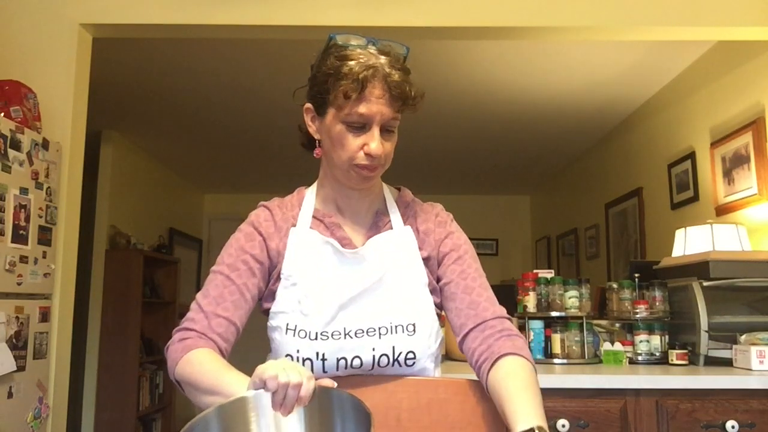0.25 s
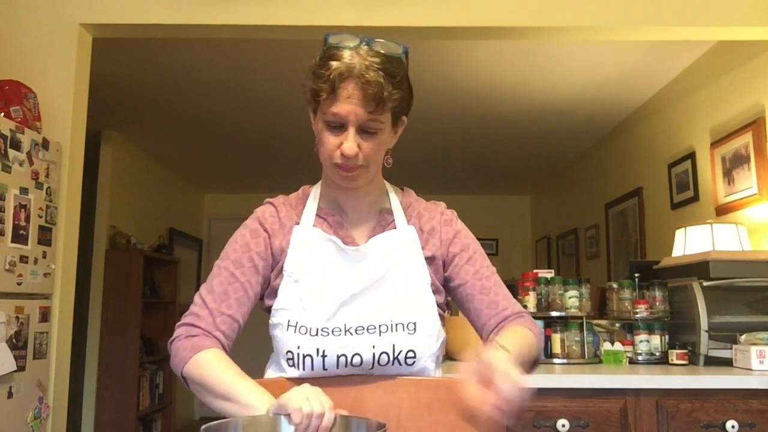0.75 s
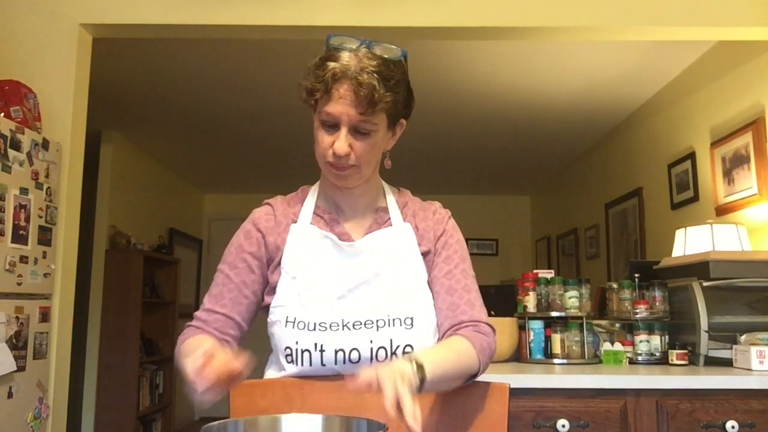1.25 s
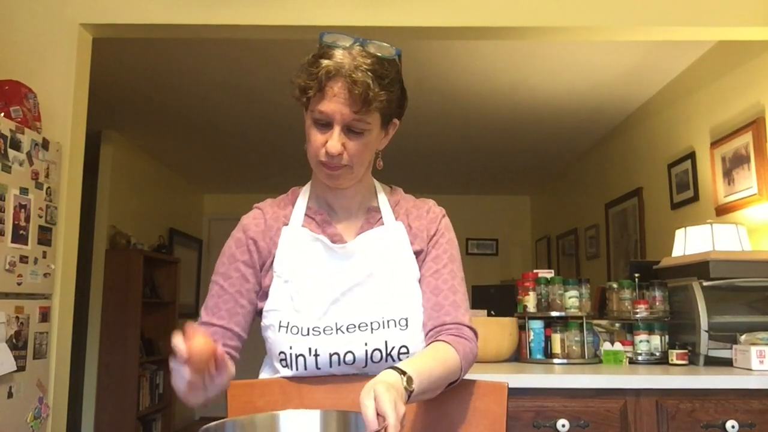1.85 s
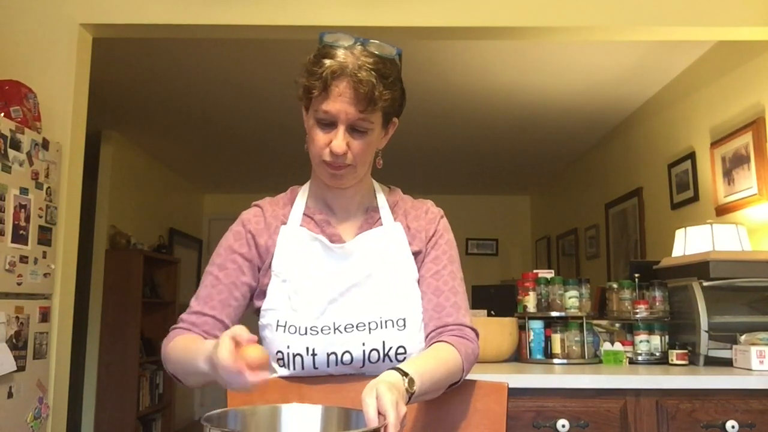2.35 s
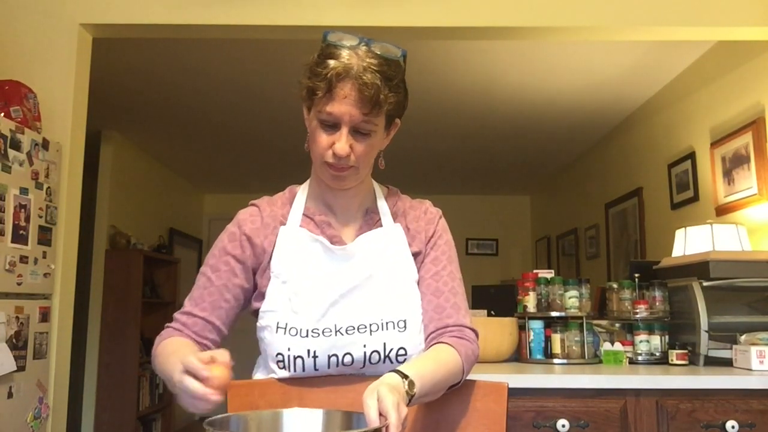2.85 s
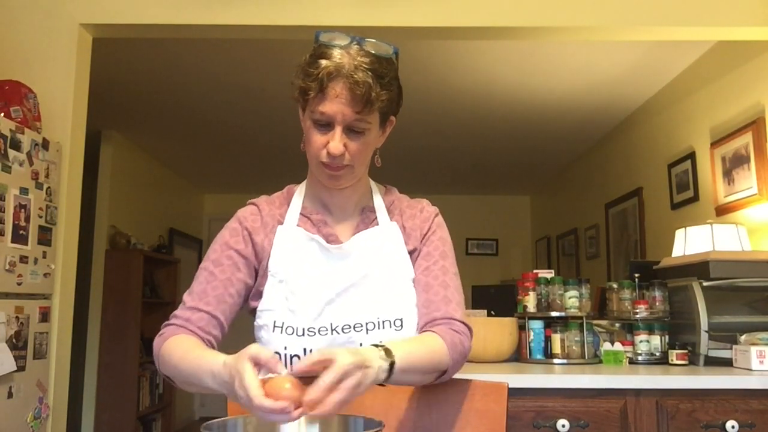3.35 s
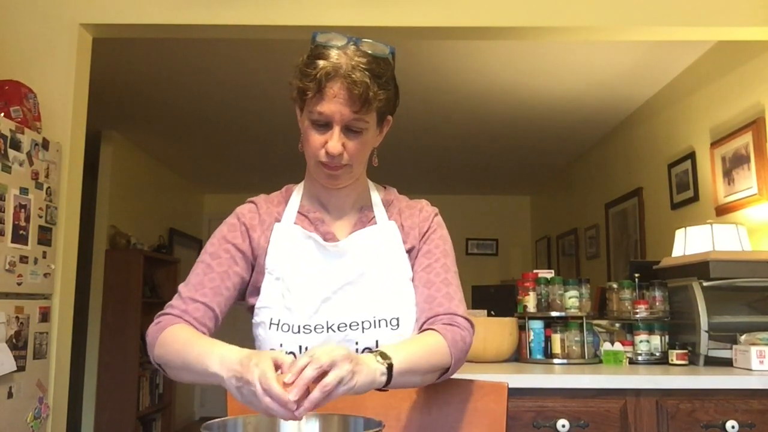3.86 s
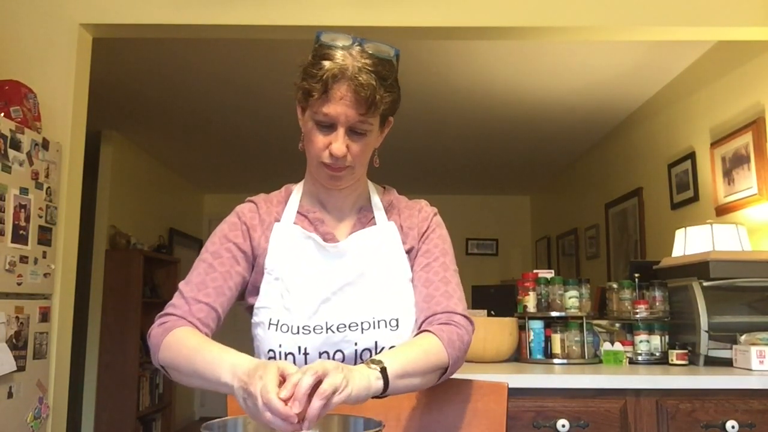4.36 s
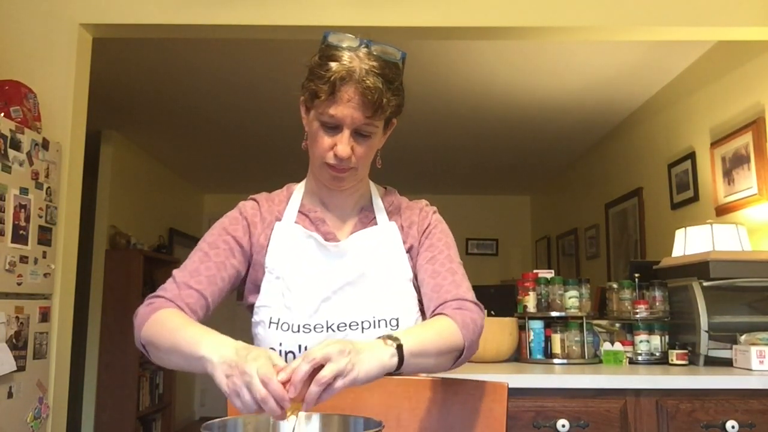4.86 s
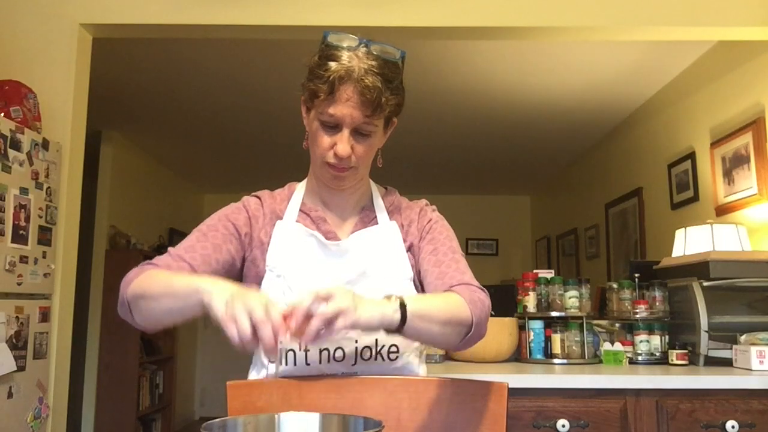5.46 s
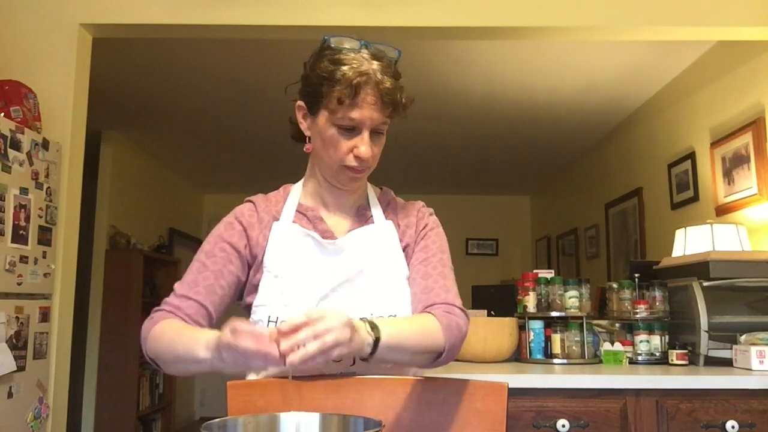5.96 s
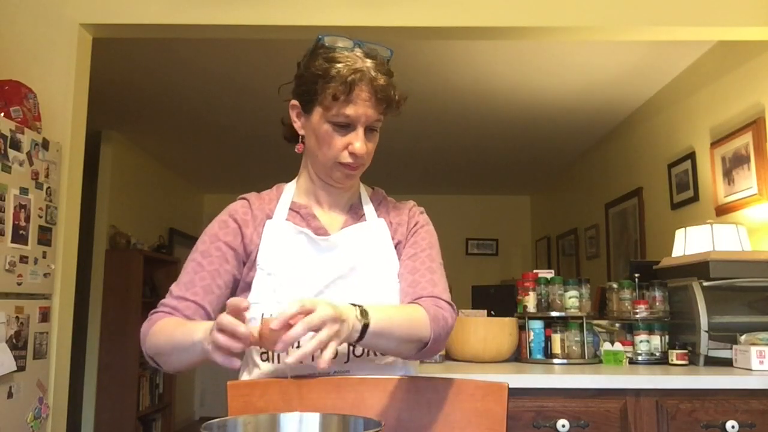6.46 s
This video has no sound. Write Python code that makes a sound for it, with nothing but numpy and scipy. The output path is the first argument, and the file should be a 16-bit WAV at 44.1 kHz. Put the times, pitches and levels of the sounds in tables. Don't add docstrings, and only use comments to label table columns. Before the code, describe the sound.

A small, hard, echoing kitchen with a low, slightly wavering fridge hum and soft air noise throughout. At 0.15 s a steel bowl lands on a wooden counter: a solid thud, bright edge click and thin lingering ring. It slides softly, and knocks again more lightly at 0.67 s, with short scrapes and dull hand bumps to 1.5 s. A faint nudge comes at 1.77 s. At 2.1 s an egg strikes the rim, a sharp crunchy tap with a short bowl ring. At 2.98 s the bowl thuds down firmly, bouncing twice more weakly. Faint falling bird chirps sound from 3.25 to 4.0 s amid light brushing. Shell snaps at 3.77 and 4.1 s, then splits loudest at 4.55-4.6 s with a quick wet tearing crackle. Small flakes tick; yolk drops with soft low slaps around 5.3-5.5 s. Scattered cracks and clicks continue to 6.2 s, then a soft rustle ends it.

```python
import sys
import numpy as np
from scipy import signal
from scipy.fft import rfft, irfft, next_fast_len
from scipy.io import wavfile
from scipy.ndimage import uniform_filter1d

SR = 44100
rng = np.random.default_rng(int(sys.argv[2]) if len(sys.argv) > 2 else 0)


def store_pcm(level_fs):
    pcm = np.round(np.clip(level_fs, -1, 1) * 32767).astype(np.int16)
    wavfile.write(sys.argv[1], SR, np.atleast_2d(pcm).T)


def decibels_to_gain(level_db):
    exponent = np.asarray(level_db, float) / 20
    return 10 ** exponent


N = 296484
T = np.arange(N) / SR
SIZE = next_fast_len(N + SR)
HZ = np.arange(SIZE // 2 + 1) * SR / SIZE + 1e-3

# [t/s, thud level/dB, edge click level/dB, ring level/dB]
LANDINGS = [
    (0.14, -20, -27.5, -35),
    (0.664, -37, -35.5, -45.5),
    (0.672, -26, -44, -45),
    (1.771, -41.5, -80, -60.5),
    (2.981, -22, -26, -35.5),
    (3.106, -35, -40.5, -53),
    (3.234, -46.5, -57, -63),
]
# [t/s, shell level/dB, low knock level/dB, contact/ms]
EGG_BLOWS = [
    (2.0974, -16.5, -31.5, 4.3),
    (2.1116, -16.5, -44, 2.7),
]


def on_log(table, hz):
    f, v = np.transpose(table)
    return np.interp(np.log(hz), np.log(f), v)


def unit(x):
    return x / np.max(np.abs(x))


def band(x, hz, octaves, order=2):
    half = 2 ** (np.clip(octaves, .05, 5) / 2)
    edges = [hz / half, min(hz * half, .45 * SR)]
    return signal.sosfilt(signal.butter(order, edges, "band", fs=SR, output="sos"), x)


def above(x, edge):
    hz = 1000 * 2 ** np.clip(edge, 0, 3.5)
    return signal.sosfilt(signal.butter(4, hz, "high", fs=SR, output="sos"), x)


def add(out, s, x):
    i = int(s * SR)
    out[i:i + len(x)] += x[:N - i]


def decay(t, t60):
    return np.exp(-np.log(1000) * t / t60)


def walk(rate):
    k = int(SR / rate)
    steps = np.repeat(rng.standard_normal(N // k + 1), k)
    return 1.302 * uniform_filter1d(uniform_filter1d(steps, k), k)[:N]


def ring(modes, scatter_db):
    t = T[:SR]
    out = np.zeros(len(t))
    for hz, db, t60 in modes:
        loudness, detune = rng.standard_normal(2)
        tone = np.sin(2 * np.pi * hz * (1 + 0.0012 * detune) * t)
        out += decibels_to_gain(db + scatter_db * loudness) * decay(t, t60) * tone
    return out


def splinters(ms, spray=.2, density=.1):
    t = T[:SR // 10]
    hits = rng.random(len(t)) < density
    x = spray * rng.standard_normal(len(t)) * hits * np.exp(-t * 1000 / max(ms, .05))
    x[0] = 1
    return x


def clicks(rows, octaves):
    out = np.zeros(N)
    for s, db, hz in rows:
        add(out, s, decibels_to_gain(db) * unit(band(splinters(3.3, 0.23), hz, octaves, order=3)))
    return out


def fridge():
    # [f/Hz, rms level/dB]
    hum = [(118.4, -56.5), (409.1, -82.5), (457.6, -76), (581.4, -80), (640.6, -73.5), (699.8, -75),
           (1486, -90)]
    # [f/Hz, level per Hz/dB]
    air_colour = [(20, -34.5), (45, -13), (124, -9.5), (197, -9.5), (470, -23), (1060, -21.5), (3000, -43),
                  (16000, -59.5)]
    air = irfft(rfft(rng.standard_normal(SIZE)) * decibels_to_gain(on_log(air_colour, HZ)), SIZE)[:N]
    air *= decibels_to_gain(-57) / air.std()
    bass = signal.sosfiltfilt(signal.butter(2, 330, fs=SR, output="sos"), air)
    out = decibels_to_gain(2.2 * walk(7)) * bass + decibels_to_gain(0.8 * walk(20)) * (air - bass)
    for hz, db in hum:
        level = decibels_to_gain(db + 5.5 + 1.2 * walk(9))
        out += level * np.sin(2 * np.pi * np.cumsum(hz + 1.6 * walk(4)) / SR)
    settle_db, settle_s = 2, 2.7
    return out * decibels_to_gain(settle_db * (np.exp(-T / settle_s) - 0.43))


def played(peak, swell, db):
    rise_db, fade_db_per_s = 21.5, 309
    before = (peak - T) * rise_db / max(swell, .003)
    after = (T - peak) * fade_db_per_s
    return decibels_to_gain(db - np.where(T < peak, before, after))


def rustle():
    # [peak t/s, swell/s, rustle level/dB, steel share level/dB]
    slides = [
        (.1, .012, -62.5, -2),
        (.13, 0.019, -72, 12),
        (.54, 0.18, -68, -20),
        (0.656, 0.017, -62, 8),
        (.745, .01, -63.5, 4),
        (.856, 0.063, -67.5, -16),
        (1.72, 0.11, -68.5, -12),
        (1.766, 0.034, -65.5, -5.5),
        (2.975, 0.012, -58.5, 9),
    ]
    # [peak t/s, swell/s, level/dB]
    brushes = [
        (3.3, 0.027, -76),
        (3.45, .1, -84),
        (3.622, 0.065, -74),
        (3.75, .04, -69),
        (6.3, .05, -85),
        (6.462, 0.23, -68),
        (6.68, 0.05, -70),
    ]
    grit = rng.standard_normal(N) * decibels_to_gain(4.1 * rng.exponential(size=N).clip(0, 5))
    hiss, cloth = band(grit, 10000, 3.4), band(grit, 4100, 3.7)
    steel = band(grit, 4350, 0.1) + 0.48 * band(grit, 5800, 0.069)
    hiss, cloth, steel = hiss / hiss.std(), cloth / cloth.std(), steel / steel.std()
    out = np.zeros(N)
    for peak, swell, db, steel_db in slides:
        out += played(peak, swell, db) * (hiss + decibels_to_gain(steel_db) * steel)
    for peak, swell, db in brushes:
        out += played(peak, swell, db) * cloth
    return out * decibels_to_gain(-8.0)


def through_board(x):
    board_lag = 0.1206
    turns = board_lag * (2 * np.sqrt(HZ + 90) - HZ / np.sqrt(5000))
    radiated = 1 / np.sqrt(1 + (115 / HZ) ** 6)
    return irfft(rfft(x, SIZE) * radiated * np.exp(-2j * np.pi * turns), SIZE)[:N]


def knocks():
    # [f/Hz, level/dB, t60/s]
    counter = [(123.6, -16, 0.13), (162.3, 4, 0.31), (186.7, 1, 0.049), (233.8, 4.5, 0.18), (298, -5, 0.22),
               (346.7, -1, 0.3), (440, 1, 0.13), (581, -14, 0.18), (723, -8, 0.23), (977, -10.5, 0.26),
               (1346, -17.5, 0.55), (1693, -15, 0.28)]
    # [f/Hz, level/dB, t60/s]
    walls = [(1870, -1, 0.224), (1625, -1, 0.27), (2610, -13, 0.31), (3973, -10.5, 0.16), (5970, -24, 0.06),
             (6040, -8, 0.097), (6510, -10, .18), (8320, -1.5, 0.04)]
    # [f/Hz, level/dB, t60/s]
    base = [(4414, 0, 0.15), (4445, -11, 0.16), (4390, -15.5, 0.47), (4490, -14, .12)]
    # [t/s, level/dB]
    bumps = [
        (0.594, -46.5),
        (0.94, -52),
        (1.473, -47),
        (6.609, -59),
    ]
    contact_lag_s = .002
    wood, edge, boom, steel = np.zeros((4, N))
    # 1 dB for the bowl, -13 dB for the hand
    hits = [(s, db, 1) for s, db, _, _ in LANDINGS] + [(s, db, -13) for s, db in bumps]
    for onset, thud_db, body_db in hits:
        s = onset + contact_lag_s
        add(wood, s, decibels_to_gain(thud_db + 4.5) * unit(band(splinters(4.2, 0.12), 289, 2.96, order=3)))
        add(wood, s, decibels_to_gain(thud_db + body_db) * unit(band(splinters(11, 0.22), 1226, 1.8, order=3)))
        add(boom, s, decibels_to_gain(thud_db + 2.0) * unit(ring(counter, 1.5)))
    for onset, _, edge_db, ring_db in LANDINGS:
        s = onset + contact_lag_s
        add(edge, s, decibels_to_gain(edge_db + 2.0) * unit(band(splinters(13.8, 0.35), 6820, 2.48)))
        add(steel, s, decibels_to_gain(ring_db + 2.5) * ring(base, .7))
        add(steel, s, decibels_to_gain(ring_db - 3) * ring(walls, 1.58))
    rattle_db, rattle_per_s = 4.5, 70
    steel *= decibels_to_gain(rattle_db * (walk(rattle_per_s) - .5))
    return through_board(wood) + edge, through_board(boom) + steel


def singing():
    # [f/Hz, level/dB, t60/s]
    tilted = [(1653, -51, .85), (2698, -55, .8), (2728, -56, .8), (4194, -49, .5), (4021, -54, .4),
              (5609, -47, .33)]
    # [f/Hz, level/dB, t60/s]
    free = [(324, -33.5, 0.056), (600, -51, 1), (963, -43, 0.78), (1775, -38.5, 0.57), (1747, -49.5, 0.75),
            (2390, -36.5, 0.06), (2680, -52, 0.66), (2730, -59.5, 1.1), (4285, -41.5, 0.14),
            (4580, -27.5, 0.026), (5770, -46, 0.17), (6300, -57.5, 0.22)]
    out = np.zeros(N)
    add(out, LANDINGS[0][0], decibels_to_gain(5.5) * ring(tilted, 0))
    add(out, EGG_BLOWS[0][0], decibels_to_gain(0.5) * ring(free, 0))
    return out


def tap():
    out = np.zeros(N)
    for s, shell_db, low_db, ms in EGG_BLOWS:
        add(out, s, decibels_to_gain(shell_db + 2.5) * unit(band(splinters(ms, 0.46, 0.2), 10750, 2.85)))
        add(out, s, decibels_to_gain(low_db + 10.0) * unit(band(splinters(ms, 0.25), 750, 3.7, order=3)))
    return out


def bird():
    # [t/s, level/dB]
    notes_sung = [
        (3.258, -73),
        (3.368, -78),
        (3.483, -76.5),
        (3.615, -78),
        (3.875, -85),
        (4.013, -79),
    ]
    start_hz, end_hz, note_s = 3620, 3120, 0.0394
    out = np.zeros(N)
    u = T[:int(note_s * SR)] / note_s
    hz = end_hz + (start_hz - end_hz) * (1 - u) ** 2
    for s, db in notes_sung:
        add(out, s, decibels_to_gain(db + 2.0) * np.sin(np.pi * u) * np.sin(2 * np.pi * np.cumsum(hz) / SR))
    return out


def loose_pieces():
    # [t/s, level/dB, f/Hz]
    pieces = [(3.43, -70, 7060), (3.45, -68, 6020), (3.765, -46, 8500), (4.094, -42, 4240),
              (4.1204, -43, 5300), (4.4547, -59, 5770), (4.518, -47, 8450), (4.55, -31, 4240),
              (4.584, -35, 3000), (4.603, -39, 3380), (4.612, -52, 3230), (4.6253, -39, 3020),
              (4.771, -47.5, 4100), (5.141, -48.5, 4030), (5.2914, -33, 8240), (5.293, -53, 4200),
              (5.299, -60, 5200), (5.34, -58, 3060), (5.3944, -45, 8300), (5.608, -59, 4600),
              (5.62, -56, 4550), (5.6437, -46, 5400), (5.885, -52, 4080), (6.065, -40.5, 4960)]
    return clicks(pieces, 0.26)


def shell():
    # [t/s, snap level/dB, low edge/octaves over 1 kHz]
    cracks = [(3.6127, -63, 1.3), (3.765, -29.5, 2.1), (4.0065, -61, 2.4), (4.0937, -27, 1.67),
              (4.1207, -32.5, 1.57), (4.3094, -46.5, 1.84), (4.3862, -57, 1.4), (4.4268, -55, 1.7),
              (4.4547, -59, 1.5), (4.5508, -23.5, 1.2), (4.578, -37, 0.65), (4.5833, -23.5, 2.56),
              (4.6255, -32.5, 0.72), (4.7715, -40.5, 0.88), (4.894, -51.5, 0.63), (5.1407, -48, 1.6),
              (5.393, -43, 0.74), (5.6443, -39.5, 1.6), (6.0655, -36.5, 1.26), (6.2248, -66, 1.7)]
    # [t/s, snap level/dB]
    flakes = [
        (3.86, -46.5),
        (5.0038, -51.5),
        (5.0516, -47),
        (5.296, -46),
        (5.5294, -64),
        (5.6178, -55),
        (6.0548, -40),
    ]
    # [t/s, level/dB, f/Hz]
    hollow = [(3.765, -56.5, 1900), (4.0936, -45.5, 2340), (4.122, -49, 1970), (4.5501, -55, 2420),
              (4.7716, -48.5, 1800), (5.2965, -48, 1510), (5.31, -54, 1300), (5.6454, -47.5, 1790),
              (5.6574, -51, 2000), (5.879, -48, 1620), (5.89, -50, 1780)]
    flake_edge = 2.4
    out = np.zeros(N)
    for s, snap_db, edge in cracks + [(s, db, flake_edge) for s, db in flakes]:
        add(out, s, decibels_to_gain(snap_db + 6.5) * unit(above(splinters(2.7, 0.27), edge)))
    tear_s, gap_s, tear_db, tear_hz = 4.5838, 0.0072, -30.5, 2170
    tear = [(tear_s + k * gap_s, tear_db - 3 * k, tear_hz) for k in range(6)]
    return out + clicks(hollow + tear, 0.49)


def crumble():
    # [t/s, level/dB, low edge/octaves over 1 kHz, length/s]
    crushes = [
        (4.105, -44, 2.7, .04),
        (4.501, -53.5, 1.64, 0.057),
        (5.288, -41, 2.82, 0.039),
        (5.64, -44.5, 1, 0.018),
        (5.865, -53.5, 1.33, .05),
        (4.31, -71, 2, 0.15),
    ]
    crumbs_per_s, scatter_db = 3600, 4
    out = np.zeros(N)
    for s, db, edge, length in crushes:
        when, sign, size = rng.random((3, SR // 4))
        u = T[:SR // 4] / length
        crumbs = (when < crumbs_per_s / SR) * np.sign(sign - .5) * decibels_to_gain(-scatter_db * np.log(size + .02))
        swell = np.sqrt(np.sin(np.pi * np.minimum(u, 1) ** 0.55).clip(0))
        add(out, s, decibels_to_gain(db) * above(crumbs * swell, edge))
    return out


def yolk():
    # [t/s, level/dB, f/Hz]
    plops = [
        (5.301, -45, 158),
        (5.324, -36.5, 157),
        (5.333, -39, 62),
        (5.359, -46, 94),
        (5.40, -49, 146),
        (5.452, -50, 157),
        (5.524, -54, 135),
        (5.53, -51, 55),
    ]
    fade_cycles = 8.9
    out = np.zeros(N)
    t = T[:SR // 4]
    for s, db, hz in plops:
        swell = (1 - np.exp(-t / 0.0055)) * decay(t, fade_cycles / hz)
        add(out, s, decibels_to_gain(db + 3.5) * swell * np.sin(2 * np.pi * hz * t * (1 - 2.8 * t)))
    return out


def kitchen(x, direct_db):
    # [f/Hz, t60/s]
    room_t60 = [(125, 0.48), (350, 0.26), (1000, 0.49), (2500, 0.34), (6000, 0.41), (12000, 0.23)]
    room_db, build_s = -12, 0.0024
    t = T[:SR // 2]
    tail = np.zeros(len(t))
    for hz in 100 * 2 ** np.arange(0, 7.6, .5):
        tail += band(rng.standard_normal(len(t)), hz, 0.56) * decay(t, on_log(room_t60, hz))
    tail *= 1 - np.exp(-t / build_s)
    tail *= decibels_to_gain(room_db) / np.sqrt(np.mean(tail[:SR // 20] ** 2)) / 10
    echoes = irfft(rfft(x, SIZE) * rfft(tail, SIZE), SIZE)[:N]
    return decibels_to_gain(direct_db) * x + echoes


def scene():
    ring_echo, piece_echo = .25, 0.56
    blows, rings = knocks()
    pieces = loose_pieces()
    at_counter = kitchen(blows + ring_echo * rings + yolk(), 2)
    at_hands = kitchen(tap() + shell() + crumble() + rustle() + piece_echo * pieces, 0)
    direct = rings + (1 - piece_echo) * pieces + singing()
    return (at_counter + at_hands + direct + bird() + fridge())[None]


def band_limit(x):
    return signal.sosfilt(signal.butter(12, 16850, fs=SR, output="sos"), x)


def record(dry):
    low_hz, top_hz = 51.1, 15750
    mix = signal.sosfilt(signal.butter(2, low_hz, "high", fs=SR, output="sos"), dry)
    mix = signal.sosfilt(signal.ellip(8, .2, 60, top_hz, fs=SR, output="sos"), mix)
    return band_limit(mix)


dry = scene()
out = record(dry)
store_pcm(out)
```